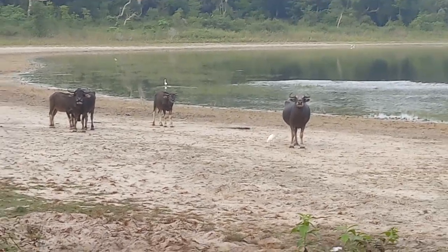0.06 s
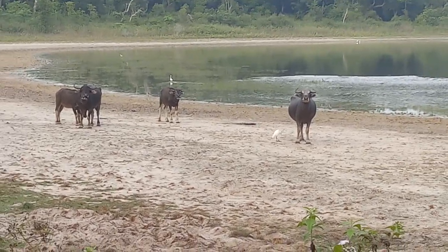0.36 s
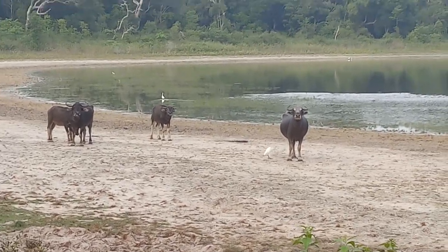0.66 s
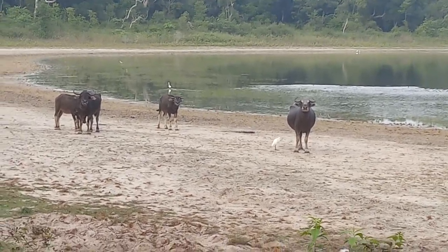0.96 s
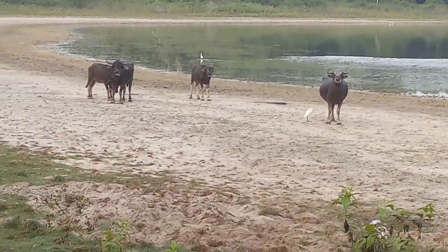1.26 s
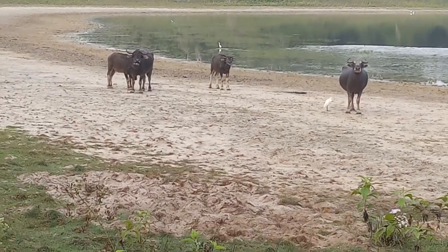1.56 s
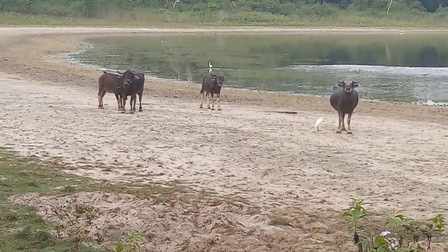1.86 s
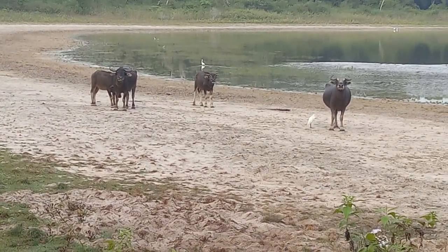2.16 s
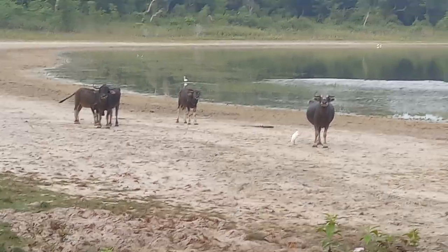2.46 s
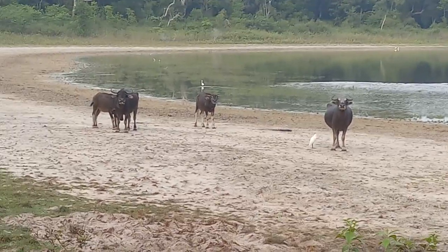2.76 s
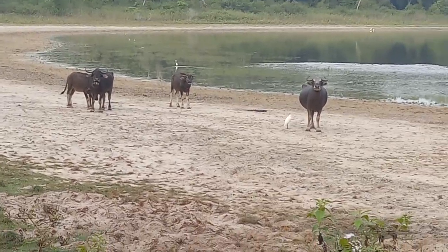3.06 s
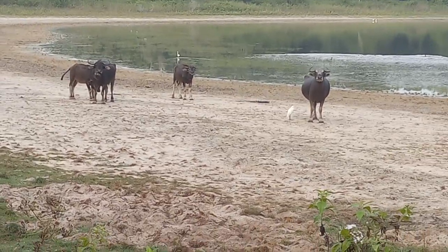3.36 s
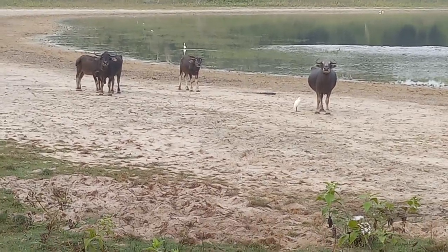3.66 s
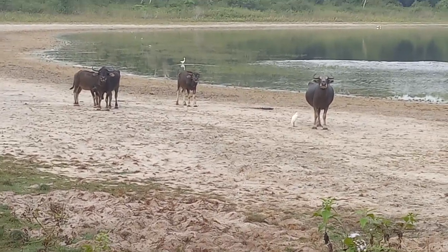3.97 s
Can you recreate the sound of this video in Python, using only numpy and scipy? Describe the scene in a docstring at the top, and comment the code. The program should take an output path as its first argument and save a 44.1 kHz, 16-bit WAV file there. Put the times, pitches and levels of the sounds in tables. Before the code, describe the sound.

Insects chirp rapidly over a shrill haze on a forest lakeshore. Distant birds hoot, whistle and chatter, then a near bird chips five times and draws a long falling whistle. A few faint knocks touch the microphone.

```python
"""Insects and birds on a forest lakeshore

Insects tick out short falling chirps over a shrill haze. A near bird chips five times and draws
a long falling whistle; farther birds hoot, whistle and chatter in the echo of the trees. Each call is
a gliding tone. Dull knocks, soft bumps and one brush, probably fingers on the camera, sound close by."""
import sys
import numpy as np
from scipy import signal
from scipy.fft import rfft, irfft
from scipy.io import wavfile
from scipy.ndimage import uniform_filter1d

SR = 44100
rng = np.random.default_rng(int(sys.argv[2]) if len(sys.argv) > 2 else 0)


def pcm_store(signal):
    """Save signal as 16-bit PCM."""
    levels = np.round(np.clip(np.atleast_2d(signal), -1, 1) * 32767)
    wavfile.write(sys.argv[1], SR, levels.astype(np.int16).T)


N = 176400  # 4 seconds


def amp(db):
    """Turns decibels into a gain."""
    return 10 ** (np.asarray(db) / 20)


def unit(x):
    """Scales a sound to an average (rms) size of 1."""
    return x / np.sqrt(np.mean(x ** 2) + 1e-20)


def add(mix, s, sound):
    """Lays a sound into the mix at s seconds."""
    at = round(s * SR)
    sound = sound[max(-at, 0):]
    part = mix[max(at, 0):][:len(sound)]
    part += sound[:len(part)]


def follow(points):
    """Joins (time, value) points with straight lines across the scene."""
    return np.interp(np.arange(N) / SR, *np.transpose(points))


def colour(x, points):
    """Turns frequencies up or down along (f/Hz, level/dB) points."""
    hz, db = np.transpose(points)
    f = np.fft.rfftfreq(len(x), 1 / SR)
    gain = amp(np.interp(np.log(f + 1), np.log(hz), db))
    return irfft(rfft(x) * gain, len(x))


def drift(size, rate):
    """Wanders by about 1, heading for a new random value `rate` times a second."""
    knots = rng.standard_normal(4000)
    return np.interp(np.arange(size) / SR * rate, np.arange(4000), knots)


def tone(hz):
    """A pure tone that follows a pitch curve."""
    return np.sqrt(2) * np.sin(2 * np.pi * (np.cumsum(hz) / SR + rng.random()))


def span(length):
    """Runs from 0 to 1 over a note of `length` seconds."""
    return np.linspace(0, 1, max(int(length * SR), 8))


def arch(u):
    """Rises from 0 to 1 and falls back."""
    return abs(np.sin(np.pi * u))


def echo(x, t60, wet_db, delay=0.0043, count=900):
    """Adds scattered echoes from ground and trees that die away over t60 seconds."""
    at, size = rng.random(count) ** 2 * t60, rng.standard_normal(count)
    taps = np.zeros(2 * SR)
    arrival = np.clip((at + delay) * SR, 0, len(taps) - 1).astype(int)
    taps[arrival] = size * at ** (1 / 4) * np.exp(-np.log(1000) * at / t60)
    return x + amp(wet_db) * signal.fftconvolve(x, taps / np.linalg.norm(taps))[:N]


def voice(hz, level, overtones):
    """A bird's tone; any overtones grow as it sings louder."""
    force = (level / amp(-25)) ** 0.32  # 1 at full voice
    return level * sum(amp(db) * (force if i else 1) * tone(k * hz)
                       for i, (k, db) in enumerate(overtones))


def whistle(points, overtones, flutter_db, waver):
    """A fluttering note along a pitch and level curve; gives its start time and sound."""
    s, hz, db = np.transpose(points)
    t = np.arange(s[0], s[-1], 1 / SR)
    pitch = uniform_filter1d(np.interp(t, s, hz), 200) * (1 + waver * drift(len(t), 198))
    level = amp(np.interp(t, s, db) + flutter_db * drift(len(t), 109.9))
    soft_ends = np.clip(np.minimum(t - t[0], t[-1] - t) / 0.0044, 0, 1)
    return s[0], voice(pitch, level * soft_ends, overtones)


# colour of still air and distant insects: f/Hz, relative level/dB
HAZE_COLOUR = [(20, -21), (50, -1.5), (85, -0.5), (135, 1.5), (200, -13.5), (400, -16.5), (700, -18),
               (1500, -16.5), (2200, -12.5), (3200, -6.5), (4100, -13.5), (5200, 7.5), (6400, -0.5),
               (7900, -5), (8700, 1.5), (9150, -0.5), (9650, -15.5), (10500, -26), (12000, -32.5),
               (14200, -23), (14800, -18.5), (15800, -36)]
# how loud the haze is: t/s, level/dB
HAZE_LEVEL = [(0, -49), (.5, -50.5), (.9, -47.5), (1.5, -49.5), (2.3, -48.5), (3.2, -48), (4, -50)]


def haze():
    """The air rumbles, distant insects blur into a shrill hiss, and a thin high whine sits on top."""
    level = amp(follow(HAZE_LEVEL) + .5 * drift(N, 12))
    hiss = unit(colour(rng.standard_normal(N), HAZE_COLOUR))
    whine = amp(-75.5) * tone(15628 + 4 * drift(N, 16))
    return level * hiss + whine


# how loud the twittering is: t/s, level/dB
TWITTER_LEVEL = [(0, -48), (.3, -55), (.55, -58.5), (.9, -57), (1.2, -57.5), (1.45, -68), (1.8, -55),
                 (2.3, -55.5), (2.6, -59), (2.85, -64), (3.15, -57), (3.45, -55), (3.621, -60.5),
                 (3.75, -54.5), (4, -59.5)]


def twitter(per_s=60, middle_hz=3142):
    """Many faint short glides blend together from birds deep in the forest."""
    out = np.zeros(N)
    notes = rng.standard_normal((int(per_s * N / SR), 5))
    for k, (stretch, pitch, slope, loud, late) in enumerate(notes):
        u = span(.04 * np.exp(.3 * stretch))
        glide = 0.1437 * slope * (u - .5) + 0.019 * drift(len(u), 615)
        hz = middle_hz * np.exp(.2 * np.clip(pitch, -3.5, 1.6) + glide)
        add(out, (k + .5 * late) / per_s, amp(3.1 * loud - 1.25 * abs(pitch)) * arch(u) * tone(hz))
    return unit(echo(out, t60=.4, wet_db=-1)) * amp(follow(TWITTER_LEVEL))


# far whistles, one list of points each: t/s, f/Hz (played 1% lower), level/dB
FAR_WHISTLES = [
    [(0, 3380, -49.5), (.045, 3230, -50), (.095, 2900, -44), (.15, 2705, -49), (.23, 2803, -49)],
    [(.42, 2980, -59), (.475, 3374, -47.5), (.56, 3417, -40), (.58, 3395, -54)],
    [(.645, 3130, -52), (.69, 3068, -37), (.755, 2844, -43), (.81, 2774, -56.5), (.84, 2714, -37.5)],
    [(.99, 2980, -49), (1.025, 3260, -42.5), (1.085, 3354, -56), (1.14, 3310, -44.5)],
    [(1.205, 3164, -54), (1.256, 3000, -33), (1.28, 2890, -45), (1.38, 2688, -45.5)],
    [(.35, 8300, -66), (.48, 7750, -56.5), (.62, 7350, -57), (.74, 7050, -59)],
    [(2.47, 8040, -66), (2.57, 8100, -69), (2.66, 7700, -55)],
    [(3.01, 1810, -71), (3.06, 1780, -58.5), (3.09, 1790, -64.5), (3.15, 1750, -70)],
]
# short pips on a nearly steady pitch: t/s, level/dB
PIPS = [(2.66, -42.5), (3.316, -44), (3.691, -42.5)]


def far_birds(pip_hz=2858):
    """Birds whistle and pip at the forest edge; each pip has one clear echo."""
    out, u = np.zeros(N), span(0.037)
    for curve in FAR_WHISTLES:
        add(out, *whistle(curve, [(0.99, 0.0039)], flutter_db=4.0, waver=0.0048))
    for s, db in PIPS:
        hz = pip_hz * (.975 + 0.0304 * arch(u) + 0.0062 * drift(len(u), 467))
        pip = amp(db) * arch(u) * tone(hz)
        add(out, s, pip)
        add(out, s + 0.049, amp(-6.5) * pip)
    out = echo(out, t60=.06, wet_db=-12, count=12)
    return echo(out, t60=0.55, wet_db=-8)


# chattering notes: t/s, length/s, first f/Hz, last f/Hz, relative level/dB
CHATTER_NOTES = [(.46, 0.055, 2820, 2830, -46.5), (0.928, 0.061, 1618, 1567, -58),
                 (1.092, 0.042, 1880, 2800, -50.5), (1.132, 0.045, 2450, 3004, -40.5),
                 (1.256, 0.04, 2800, 1836, -46), (1.512, 0.042, 2068, 3197, -36.5),
                 (1.572, 0.036, 3500, 4180, -44.5), (1.601, 0.032, 4100, 3260, -40.5),
                 (1.619, 0.09, 2450, 1465, -51.5), (1.692, 0.038, 1660, 2366, -46),
                 (1.836, 0.031, 1862, 2816, -44.5), (1.891, .035, 2190, 3300, -65),
                 (1.977, 0.054, 2250, 3027, -38), (2.11, 0.029, 3900, 3130, -45.5),
                 (2.133, 0.0318, 2700, 3207, -40.5), (2.246, .045, 2950, 3475, -48),
                 (2.31, .045, 3450, 2890, -40.5), (2.345, .035, 3000, 3475, -41),
                 (2.4, 0.052, 2910, 2418, -42.5), (2.87, 0.057, 1500, 1304, -63.5),
                 (3.19, .09, 2285, 2590, -58.5)]


def chatter():
    """A far bird's quick raspy glides, smeared by the trees."""
    out = np.zeros(N)
    for s, length, first_hz, last_hz, db in CHATTER_NOTES:
        u = span(length)
        glide = first_hz + (last_hz - first_hz) * u
        rasp = 1 + 0.051 * drift(len(u), 900)
        add(out, s, amp(db - 2.5) * arch(u) ** 1.08 * tone(glide * rasp))
    out = echo(out, t60=.08, wet_db=-2.5, delay=.001)
    return echo(out, t60=.7, wet_db=-5)


# rolling hoots: t/s, f/Hz, relative level/dB
HOOT_CALLS = [(-.01, 864, -48.5), (.235, 848, -52), (.612, 911.4, -46), (1.165, 932.5, -43.5),
              (1.697, 936, -44), (2.229, 958.3, -43), (2.783, 946.6, -42.5), (3.342, 946.6, -42.5),
              (3.93, 941, -43.5)]


def hoots(note_s=0.0521, step_s=.064, sag=0.0098):
    """A far bird hoots three arched notes to a call, each a little lower than the last."""
    out, u = np.zeros(N), span(note_s)
    for s, hz, db in HOOT_CALLS:
        for k in range(3):
            bend = .11 * (arch(u) - .8) - .04 * (u - .5) + .018 * drift(len(u), 131)
            pitch = hz * (1 - sag * k) * (1 + bend)
            add(out, s + k * step_s, amp(db - 2) * arch(u) * tone(pitch))
    return echo(out, t60=.6, wet_db=-5.5, delay=.012)


# dull knocks: t/s, rattle length/s, level/dB
KNOCKS = [(.125, 0.022, -43), (.573, 0.022, -48), (.843, 0.042, -49), (1.187, 0.034, -47),
          (1.711, 0.032, -42.5), (2.777, 0.023, -43.5)]
# colour of a knock: f/Hz, relative level/dB
KNOCK_COLOUR = [(30, -28), (70, -3), (130, 13.5), (220, -3.5), (400, 4.5), (580, 4), (750, -7),
                (1000, -6.5), (1400, -21.5), (2500, -11.5), (5000, -67), (16000, -70)]


def knocks(slips_per_s=240, lead_s=.01, fade_s=0.019):
    """Each knock is a quick run of tiny slips, probably of a finger on the camera."""
    out, t = np.zeros(N), np.arange(SR // 4) / SR
    for s, length, db in KNOCKS:
        pace = slips_per_s * np.exp(.6 * drift(len(t), 300)) * (t > lead_s)
        slips = np.diff(np.ceil(np.cumsum(pace) / SR), prepend=0)  # one click per slip
        rattle = (unit(slips) + .5 * rng.standard_normal(len(t))) * (t >= lead_s)
        fade = np.exp(-np.maximum(t - lead_s - length, 0) / fade_s) * np.exp(-t / 0.11)
        knock = unit(colour(rattle * fade, KNOCK_COLOUR)) * np.sqrt(length / t[-1])
        add(out, s - lead_s, -amp(db) * knock)
    return out


# soft bumps: t/s, length/s, level/dB
BUMPS = [(0.628, 0.13, -47.5), (2.173, 0.074, -52.5)]
# colour of a bump: f/Hz, relative level/dB
BUMP_COLOUR = [(30, -35), (80, -4.5), (140, 7.5), (220, -17.5), (400, -20.5), (1500, -31), (8000, -80)]


def bumps():
    """Two soft touches, each a short swell of deep noise."""
    out = np.zeros(N)
    for s, length, db in BUMPS:
        u = span(length)
        rumble = unit(colour(rng.standard_normal(SR), BUMP_COLOUR))
        add(out, s, amp(db) * arch(u) * rumble[:len(u)])
    return out


# colour of the brush: f/Hz, relative level/dB
BRUSH_COLOUR = [(100, 2), (500, -9), (2000, -3), (4000, 0.5), (8000, -3), (10500, -8), (13000, -4),
                (16000, -14)]


def brush(at_s=0.654, width_s=0.028):
    """One brush on the camera: a rough hiss swells and leaves a faint tail."""
    since = np.arange(N) / SR - at_s
    swell = np.exp(-abs(since / width_s) ** 1.4)
    tail = amp(-15) * (since > 0) * np.exp(-abs(since) / .07)
    rough_level = amp(-43.5 + 2 * drift(N, 400))
    return rough_level * (swell + tail) * unit(colour(rng.standard_normal(N), BRUSH_COLOUR))


def chirp(scale, stretch, octave_db):
    """One insect chirp: a slightly raspy tone that falls ever faster, with a faint octave above."""
    u = span(0.0154 * stretch)
    hz = scale * (5749 - 1220 * u ** 1.922)
    rasp = 1 + 0.27 * drift(len(u), 700)
    tones = tone(hz) + amp(octave_db) * (1 - u) * tone(2 * hz)
    return arch(u ** 1.03) * rasp * tones / np.sqrt(2)


# how loud the farther insects are: t/s, relative level/dB
CROWD_LEVEL = [(0, -33.5), (.15, -43), (.25, -44.5), (.45, -41), (.6, -47), (.75, -41), (1.0, -37.5),
               (1.3, -42.5), (1.47, -40), (1.8, -39), (2.3, -40), (2.7, -40), (3.0, -37), (3.35, -36),
               (3.62, -43.5), (3.8, -42), (4, -35)]


def insect_crowd(per_s=110):
    """Farther insects chirp so often that their calls and echoes run together."""
    out = np.zeros(N)
    for k, (late, loud, pitch, stretch) in enumerate(rng.uniform(-1, 1, (int(per_s * N / SR), 4))):
        call = chirp(.99 + 0.0299 * pitch, 1 + 0.207 * stretch, octave_db=-46)
        add(out, (k + late) / per_s, amp(5.2 * loud) * call)
    return unit(echo(out, t60=.15, wet_db=1.5)) * amp(follow(CROWD_LEVEL) - 3.5)


# the loudest insect chirps: t/s, relative level/dB
NEAR_CHIRPS = [(0.03, -39), (0.062, -43), (0.109, -36.0), (0.131, -37.5), (0.205, -39.5), (0.267, -39.5),
               (0.292, -40), (0.35, -37.5), (0.373, -39), (0.441, -41), (0.467, -43), (0.484, -41.0),
               (0.708, -41.5), (0.748, -37.5), (0.779, -35.5), (0.819, -31.0), (0.844, -30.5), (0.886, -32),
               (0.903, -31.5), (0.953, -30.5), (0.977, -31), (1.021, -32.5), (1.031, -31.5), (1.052, -31),
               (1.074, -42), (1.099, -31.5), (1.122, -35.5), (1.162, -39), (1.206, -38.5), (1.233, -37),
               (1.28, -37.5), (1.299, -39.5), (1.349, -37.5), (1.372, -38.0), (1.604, -38), (1.649, -42),
               (1.674, -41), (1.687, -39.5), (1.727, -36), (1.766, -35), (1.816, -36.5), (1.843, -34.5),
               (1.883, -35.5), (1.914, -33.5), (1.948, -34.5), (1.971, -34.0), (1.991, -35.5),
               (2.017, -33.5), (2.043, -34), (2.059, -36.0), (2.08, -36.0), (2.093, -40), (2.113, -35.5),
               (2.168, -35.0), (2.19, -35.5), (2.434, -37.0), (2.473, -39.0), (2.496, -36.5), (2.54, -40.5),
               (2.561, -38), (2.604, -36.5), (2.628, -37.5), (2.676, -36), (2.695, -36.0), (2.753, -36.5),
               (2.773, -37), (2.789, -37), (2.824, -37.5), (2.846, -34.5), (2.896, -32.5), (2.911, -35.5),
               (2.962, -36.0), (2.981, -35.5), (3.014, -40), (3.038, -34), (3.061, -34), (3.078, -33.5),
               (3.103, -33), (3.149, -31.5), (3.172, -35), (3.222, -34), (3.246, -41), (3.344, -36.5),
               (3.364, -37), (3.422, -37), (3.443, -37), (3.502, -37), (3.526, -35.5), (3.634, -39.5),
               (3.657, -42.5), (3.725, -42), (3.749, -37), (3.789, -37.5), (3.815, -36), (3.851, -38),
               (3.875, -37.0), (3.917, -38), (3.939, -36.5), (3.971, -35.5), (3.986, -38.0)]


def near_insects(bounce_db=-13):
    """Insects chirp close by, and each chirp bounces off the ground three times."""
    out = np.zeros(N)
    for s, db in NEAR_CHIRPS:
        pitch, stretch, *paths = rng.uniform(-1, 1, 5)
        call = amp(db + 3.5) * chirp(1 + 0.017 * pitch, 1 + 0.16 * stretch, octave_db=-34.5)
        add(out, s, call)
        for path in paths:
            add(out, s + 0.0024 + .007 * abs(path), amp(bounce_db) * call)
    return echo(out, t60=0.27, wet_db=-19.5)


# the near bird's chips: t/s, length/s, top f/Hz, level/dB
CHIPS = [(2.066, 0.043, 6380, -35), (2.138, 0.029, 6840, -31.5), (2.205, 0.034, 6990, -26),
         (2.288, .038, 7040, -25), (2.361, 0.055, 6950, -31.5)]
# its short sliding note and its long whistle: t/s, f/Hz, level/dB
SLIDE = [(2.62, 6450, -55), (2.65, 6870, -39), (2.678, 6945, -25.5), (2.688, 7100, -34), (2.699, 8200, -35),
         (2.709, 7030, -28.5), (2.718, 6260, -39), (2.732, 6400, -38)]
LONG_WHISTLE = [(2.848, 7580, -55), (2.857, 7080, -39), (2.867, 6920, -27.5), (2.878, 7600, -43),
                (2.89, 8260, -51), (2.912, 8400, -39), (2.936, 8300, -50), (2.956, 7800, -35.5),
                (2.997, 7680, -42), (3.022, 7420, -22.5), (3.075, 7050, -28.5), (3.125, 6830, -24.5),
                (3.19, 6526, -29.5), (3.229, 6327, -25), (3.27, 5970, -30), (3.298, 5590, -28.5),
                (3.318, 4830, -29.5), (3.332, 3370, -48)]
# the tones in its full voice: multiple of the pitch, relative level/dB
OVERTONES = [(1, -3), (1.5, -30.5), (2, -23)]
# how its highest overtones fade on the way: f/Hz, level change/dB
AIR_LOSS = [(100, 0), (13400, 0.5), (14300, -12), (16000, -20)]


def near_bird():
    """Five chips that shoot up and level off, a sliding note, then the long falling whistle."""
    out = np.zeros(N)
    for s, length, top_hz, db in CHIPS:
        u = span(length)
        rise = 1.01 - .5 * np.exp(-u / .19)
        droop = 0.071 * np.maximum(u - .65, 0)
        hz = top_hz * (rise - droop + 0.005 * drift(len(u), 270))
        level = amp(db + 2.1 * drift(len(u), 150)) * arch(u ** 1.28) ** 1.18
        add(out, s, voice(hz, level, OVERTONES))
    for curve in SLIDE, LONG_WHISTLE:
        add(out, *whistle(curve, OVERTONES, flutter_db=3.5, waver=0.0042))
    out = echo(colour(out, AIR_LOSS), t60=.09, wet_db=-11, delay=.002)
    return echo(out, t60=.45, wet_db=-21)


def scene():
    """Adds all the sounds into one channel."""
    forest = haze() + twitter() + far_birds() + chatter() + hoots()
    touches = knocks() + bumps() + brush()
    return (forest + touches + insect_crowd() + near_insects() + near_bird())[None]


def record(dry):
    """Cuts away the highest treble, above 15850 Hz."""
    low_pass = signal.firwin(601, 15850, window=("kaiser", 9), fs=SR)
    return signal.oaconvolve(dry, low_pass[None], "same")


dry = scene()
out = record(dry)
pcm_store(out)
```